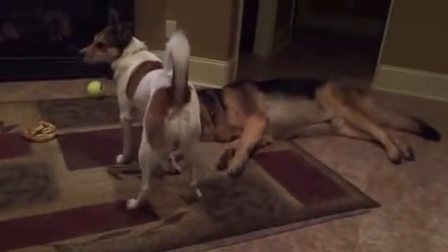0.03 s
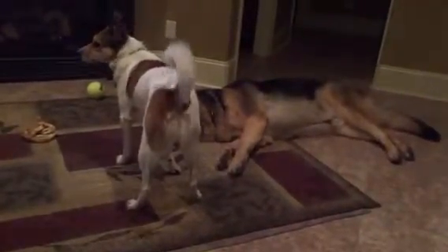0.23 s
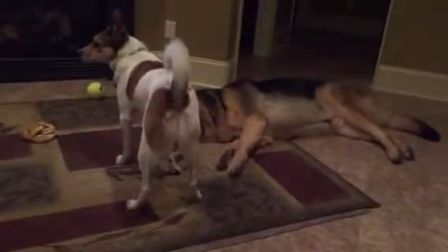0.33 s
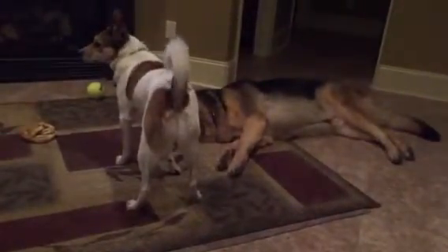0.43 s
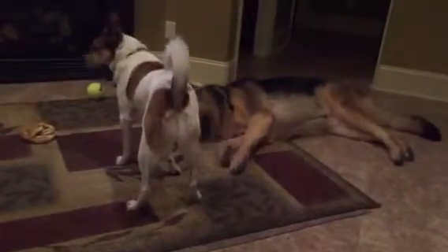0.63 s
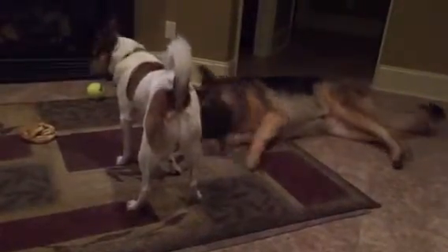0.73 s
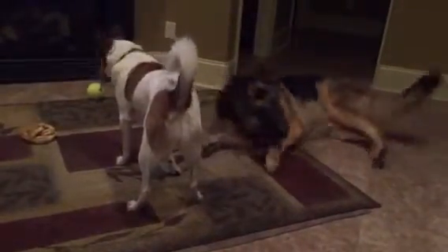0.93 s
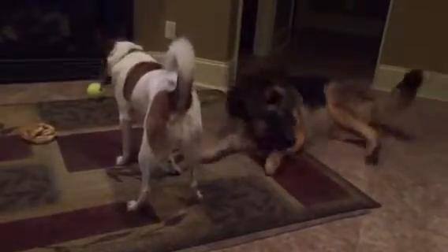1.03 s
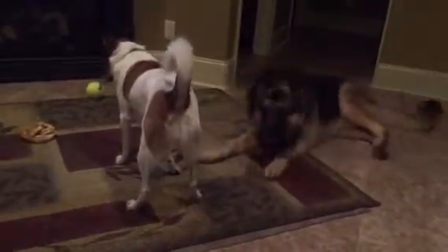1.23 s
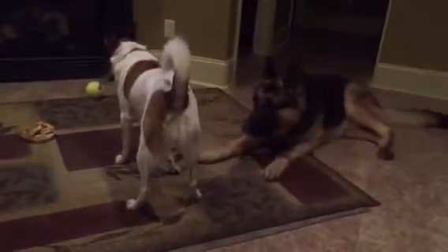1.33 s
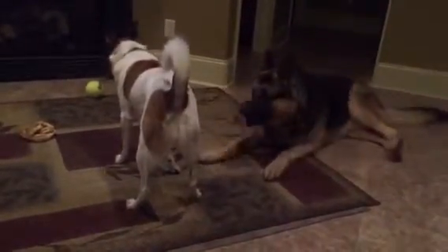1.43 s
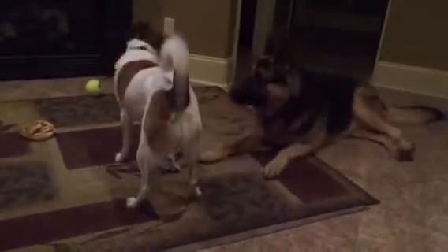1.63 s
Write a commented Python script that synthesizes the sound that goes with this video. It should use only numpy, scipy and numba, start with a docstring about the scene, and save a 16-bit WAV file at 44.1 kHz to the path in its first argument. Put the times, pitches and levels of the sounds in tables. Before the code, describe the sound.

A large dog gives one short, gruff woof that ends in a huff of air and rings briefly in a quiet room. Faint fur rustling and soft paw taps follow, heard nearby over a low hum.

```python
"""One woof in a living room

A large dog lies on a rug in a quiet room, heard from nearby on one microphone over a low hum.
It gives one gruff woof: a few slow throat pulses ring its throat and mouth as the jaw opens,
and a huff of air ends the bark. The room rings on. The dog then rolls upright, with a faint
rustle of fur and small paw taps."""
import sys
import numpy as np
from scipy import signal
from scipy.fft import rfft, irfft
from scipy.io import wavfile
from numba import njit

SR = 44100
rng = np.random.default_rng(int(sys.argv[2]) if len(sys.argv) > 2 else 0)


def generate_wav(signal):
    """Clip the signal to [-1, 1] and save it as 16-bit WAV at the path in sys.argv[1]."""
    frames = np.transpose(np.atleast_2d(signal))
    scaled = np.clip(frames, -1, 1) * 32767
    pcm = np.round(scaled).astype(np.int16)
    wavfile.write(sys.argv[1], SR, pcm)


N = 74970
TIME = np.arange(N) / SR


def from_db(db):
    """Decibels to gain."""
    return 10 ** (np.asarray(db) / 20)


def rms_one(x):
    """Scale to rms 1."""
    return x / np.sqrt(np.mean(x ** 2) + 1e-20)


def in_time(rows):
    """A control curve at every sample."""
    return np.interp(TIME, *np.transpose(rows))


def burst(rows):
    """Gain from a dB curve, silent outside it."""
    return from_db(np.interp(TIME, *np.transpose(rows), left=-200, right=-200))


def decay(age, t60):
    """Gain that falls 60 dB in t60 seconds."""
    return np.exp(-np.log(1000) * age / t60)


def at_hz(rows, hz, column=1):
    """Read a column of a spectrum table on a log-frequency axis."""
    rows = np.array(rows)
    return np.interp(np.log(np.maximum(hz, 1)), np.log(rows[:, 0]), rows[:, column])


def butter(x, hz, kind):
    """Second-order Butterworth filter."""
    sos = signal.butter(2, np.minimum(hz, SR / 2 - 1), kind, fs=SR, output="sos")
    return signal.sosfilt(sos, x + 1e-18)


def noise(colour, peaks=()):
    """Noise of the given colour, with optional narrow resonances; rms 1."""
    hz = np.arange(N // 2 + 1) * SR / N
    lift_db = sum(lift / (1 + (2 * (hz - centre) / width) ** 2) for centre, width, lift in peaks)
    spectrum = rfft(rng.standard_normal(N)) * from_db(at_hz(colour, hz) + lift_db)
    return rms_one(irfft(spectrum, N))


def noise_band(hz, spread):
    """Noise reaching the share `spread` to either side of hz; rms 1."""
    return rms_one(butter(rng.standard_normal(N), [hz * (1 - spread), hz * (1 + spread)], "band"))


@njit
def resonate(x, hz, width):
    """A moving resonance; a unit click rings it at height 1."""
    out, state = np.zeros(len(x)), 0j
    for i in range(len(x)):
        state = state * np.exp((2j * np.pi * hz[i] - np.pi * width) / SR) + x[i] + 1e-18
        out[i] = state.imag
    return out


def room_tone():
    """An appliance hums faintly in the low, steady noise of the room."""
    # lines of the hum (f/Hz, level/dB)
    hum_lines = [(75.4, -73.5), (150.7, -75), (269.2, -77.5), (360.7, -77)]
    # colour of the room noise (f/Hz, relative level/dB)
    colour = [(25, -31), (45, 3.5), (68, 0), (105, 0), (160, 0.5), (260, -3), (370, -7.5), (500, -15.5),
              (1000, -17.5), (2500, -23), (6000, -26.5), (15000, -33.5)]
    hum = sum(from_db(db) * np.sqrt(2) * np.sin(2 * np.pi * (hz * TIME + rng.random()))
              for hz, db in hum_lines)
    return hum + from_db(-66.3) * noise(colour)


def living_room(direct):
    """The microphone gets the direct sound, two near echoes and a tail that dies sooner in the treble."""
    # reverberation (f/Hz, t60/s, level/dB)
    reverb = [(70, 0.78, -8), (130, 0.91, -14.5), (228, 0.63, -10.5), (370, 0.47, -8), (550, 0.67, -5),
              (880, 0.77, -13.5), (1350, 0.72, -9), (2200, 0.75, -7), (4500, .58, -7), (7500, .38, -4),
              (12000, .24, -6.5)]
    # echoes from floor and walls (delay/s, gain)
    reflections = [(.0058, 0.15), (0.0109, 0.11)]
    delay_s, build_s = 0.004, 0.004
    edges_hz = np.geomspace(45, 18000, 19)
    white, tail = rng.standard_normal((2, N)), np.zeros(N)
    age = np.maximum(TIME - delay_s, 0)
    build_up = 1 - np.exp(-age / build_s)
    for k, (low, high) in enumerate(zip(edges_hz, edges_hz[1:])):
        hz = np.sqrt(low * high)
        band = butter(white[k % 2], [low, high], "band") * build_up * decay(age, at_hz(reverb, hz))
        unit_gain_band = rms_one(band) * np.sqrt(2 * (high - low) / SR / N)
        tail += unit_gain_band * from_db(at_hz(reverb, hz, column=2))
    echoes = sum(gain * np.interp(TIME - delay, TIME, direct) for delay, gain in reflections)
    return direct + echoes + signal.fftconvolve(direct, tail)[:N]


def rustle():
    """Fur drags over the rug in fine uneven grains, with a few brighter scuffs."""
    # fur brushing the rug as the dog rolls up (t/s, level/dB)
    brushing = [(0, -100), (.68, -79.5), (.79, -70), (.92, -72.5), (1.02, -78.5), (1.14, -69.5),
                (1.22, -71), (1.30, -74), (1.37, -70), (1.47, -71), (1.7, -82)]
    # colour of the fur (f/Hz, relative level/dB)
    colour = [(250, -10), (650, -0.5), (1300, -4), (2100, -2), (2800, -8), (4100, -10.5), (5000, -16),
              (7000, -16), (14000, -26)]
    # paws scuffing the rug (t/s, level/dB, centre f/Hz, half length/s)
    scuffs = [(0.784, -80.5, 6240, 0.04), (1.288, -76.5, 4000, 0.0094), (1.465, -76.5, 4000, 0.0091)]
    grain_db = 1.2 * rms_one(butter(rng.standard_normal(N), 150, "low"))
    out = from_db(in_time(brushing)) * rms_one(noise(colour) * from_db(grain_db))
    for peak_s, db, hz, half_s in scuffs:
        swell = np.exp(-((TIME - peak_s) / half_s) ** 2)
        out += from_db(db) * swell * noise_band(hz, spread=0.073)
    return out


def paws():
    """Paws and body meet the floor in dull damped knocks; the claws add tiny ticks."""
    # soft knocks (t/s, level/dB, f/Hz, t60/s)
    knocks = [(.714, -52.5, 960, 0.044), (.919, -43, 310, 0.033), (1.161, -50.5, 187, 0.036),
              (1.328, -54, 209, 0.044), (1.496, -48.5, 135, .07)]
    # claw ticks (t/s, level/dB, centre f/Hz, t60/s)
    ticks = [(.9215, -56.5, 7600, 0.005), (.929, -70.5, 7100, 0.047), (1.153, -77, 13500, .015)]
    rise_s = 0.0041
    out = np.zeros(N)
    for start, db, hz, t60 in knocks:
        age = np.maximum(TIME - start, 0)
        envelope = np.minimum(age / rise_s, 1) * decay(age, t60)
        out += from_db(db) * envelope * np.sin(2 * np.pi * hz * age)
    for start, db, hz, t60 in ticks:
        age = np.maximum(TIME - start, 0)
        out += from_db(db) * (age > 0) * decay(age, t60) * noise_band(hz, spread=0.16)
    return out


def huff():
    """A snort as the bark starts, then the rush of air that ends it, with a hiss past the teeth."""
    # air through the nose while the mouth is still shut (t/s, level/dB)
    snort = [(.19, -79.5), (.198, -69.5), (.215, -58), (.23, -60.5), (.25, -74.5)]
    # colour of the snort (f/Hz, relative level/dB)
    snort_colour = [(1800, -10), (2800, 0), (3600, -21), (5100, -14), (5700, 1.5), (6300, 2.5),
                    (7400, -6.5), (8600, -7), (10200, -18.5), (11400, -11), (12500, -12), (14500, -10)]
    # air through the mouth (t/s, level/dB)
    breath = [(.19, -58), (.198, -61), (.224, -53.5), (.236, -35.5), (.256, -31), (.28, -34), (.30, -36),
              (.34, -62)]
    # colour of that air (f/Hz, relative level/dB)
    breath_colour = [(35, -27), (65, -3.5), (95, -12), (135, 9), (220, 2), (400, 9.5), (520, -3),
                     (900, 5.5), (1250, -3.5), (1700, -6.5), (2050, -3), (2600, -13), (3300, -14.5),
                     (4400, -14.5), (5200, -27), (9000, -49)]
    # air past the teeth (t/s, level/dB)
    hiss = [(.205, -91), (.228, -70.5), (.244, -50), (.262, -43.5), (.285, -46), (.305, -72), (.35, -78)]
    # colour of the hiss (f/Hz, relative level/dB)
    hiss_colour = [(2000, -17), (4000, -1.5), (5100, -4.5), (5900, -2), (7000, -7), (9000, -8.5),
                   (10400, -15.5), (11500, -12.5), (15500, -17.5)]
    # narrow resonances of the open mouth (f/Hz, width/Hz, lift/dB)
    mouth_peaks = [(1540, 100, 5), (2050, 120, 0), (2570, 80, 6.5), (2820, 100, 5), (3660, 120, 3),
                   (4325, 91, 1), (5820, 160, 6.5), (6820, 120, 4.5)]
    return (burst(snort) * noise(snort_colour)
            + burst(breath) * noise(breath_colour, mouth_peaks)
            + burst(hiss) * noise(hiss_colour, mouth_peaks))


def throat_pulses():
    """The throat snaps shut in a few slow pulses, each followed by a rasp of turbulence."""
    # force of the voice (t/s, relative level/dB)
    effort = [(.193, -8), (.21, 0.5), (.226, -1.5), (.241, 2), (.258, -2.5), (.274, -13.5), (.30, -24)]
    start_s, end_s = 0.193, 0.28
    pulse_hz, jitter, closing_s = 61.76, 0.004, 0.00032
    rasp_db, rasp_decay_s = -5.5, 0.019
    periods = (1 + jitter * rng.standard_normal(12)) / pulse_hz
    onsets = start_s + np.cumsum(periods) - periods[0]
    pulses, rasp_envelope = np.zeros(N), np.zeros(N)
    for onset in onsets[onsets < end_s]:
        age = np.maximum(TIME - onset, 0)
        pulses += (age > 0) * np.exp(-age / closing_s) / (closing_s * SR)
        rasp_envelope += (age > 0) * np.exp(-age / rasp_decay_s) / np.sqrt(rasp_decay_s * SR / 2)
    rasp = from_db(rasp_db) * rasp_envelope * rng.standard_normal(N)
    return (pulses + rasp) * from_db(in_time(effort))


def woof():
    """The pulses ring the throat and mouth, whose resonances shift and brighten as the jaw opens."""
    # opening of the jaw (t/s, share 0-1)
    jaw_opening = [(.193, 0.01), (.21, 0.06), (.226, 0.74), (.243, 1), (.27, .95), (.31, 0.26)]
    # throat and mouth resonances (closed f/Hz, open f/Hz, width/Hz, closed gain/dB, open gain/dB)
    formants = [(140, 180, 65, -19, -37.5), (252.5, 369, 42.4, -13, -14.5), (638, 622, 50, -33, -25.5),
                (723, 764.6, 29, -38, -17.5), (887, 925, 64, -35, -15), (1000, 1100, 70, -55.5, -27),
                (1408, 1532, 120, -65.5, -33.5), (1908, 2060, 150, -85, -34.5)]
    notch_hz, notch_width_hz, notch_share = 540, 100, 0.63
    chest_cut_hz = 118
    source, jaw = throat_pulses(), in_time(jaw_opening)
    voice = np.zeros(N)
    for k, (closed_hz, open_hz, width, closed_db, open_db) in enumerate(formants):
        drive = source * from_db(closed_db + jaw * (open_db - closed_db))
        hz = closed_hz + jaw * (open_hz - closed_hz)
        voice += (-1) ** k * resonate(drive, hz, width)
    # the nasal passage takes out a band between the resonances
    notched = signal.lfilter(*signal.iirnotch(notch_hz, notch_hz / notch_width_hz, fs=SR), voice)
    voice += notch_share * (notched - voice)
    return butter(butter(voice, chest_cut_hz, "high"), chest_cut_hz, "high")


def scene():
    """At the microphone, in mono: the bark with its reverberation, the dog's movement, the room tone."""
    bark = living_room(woof() + huff())
    return (bark + rustle() + paws() + room_tone())[None]


def record(dry):
    """The microphone chain cuts the top treble steeply."""
    cutoff_hz = 15750
    return signal.sosfilt(signal.ellip(12, 0.1, 90, cutoff_hz, fs=SR, output="sos"), dry)


dry = scene()
out = record(dry)
generate_wav(out)
```